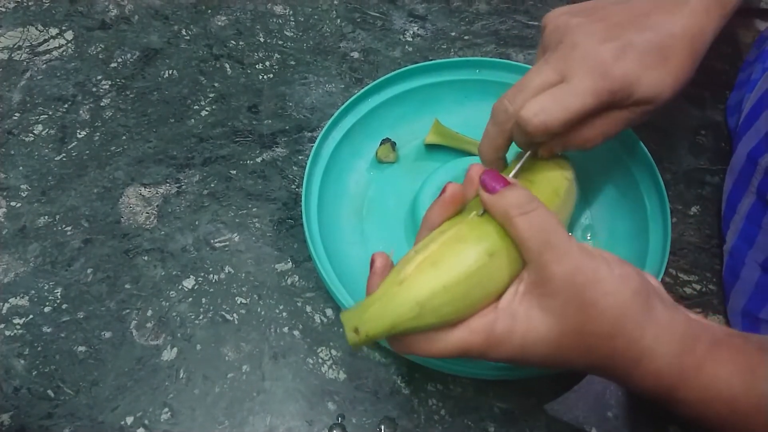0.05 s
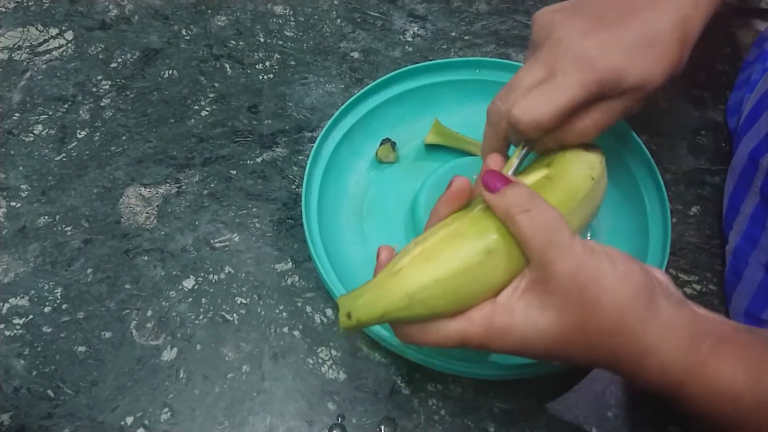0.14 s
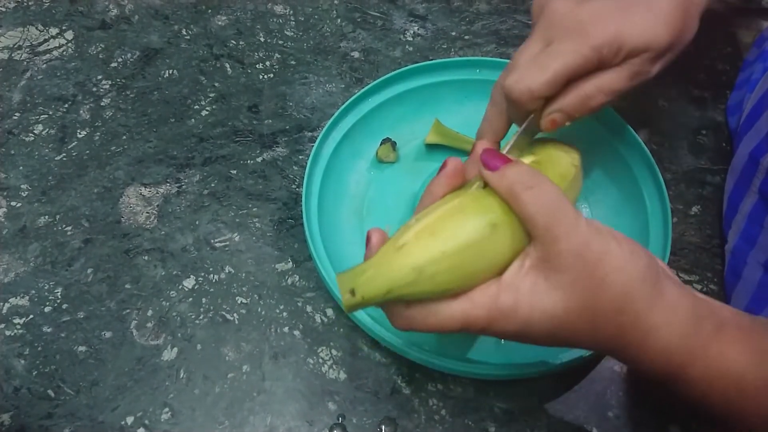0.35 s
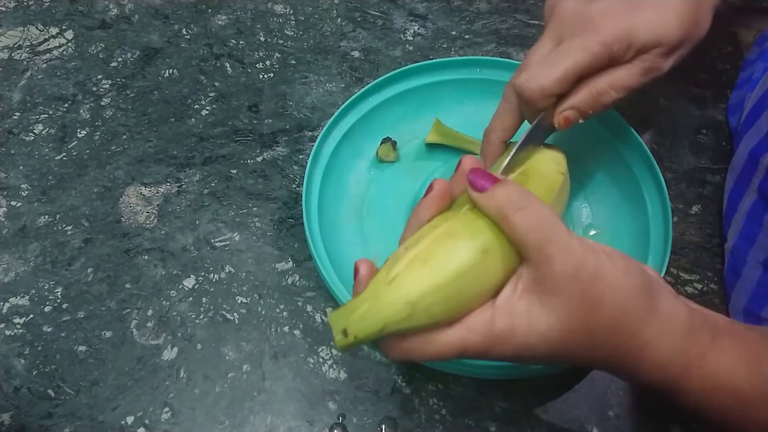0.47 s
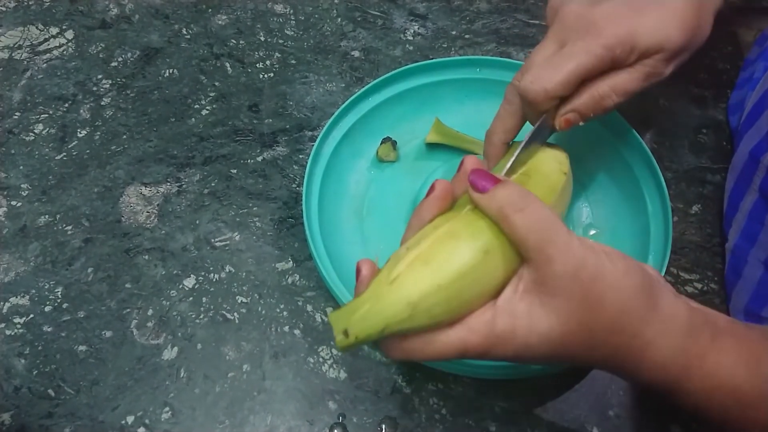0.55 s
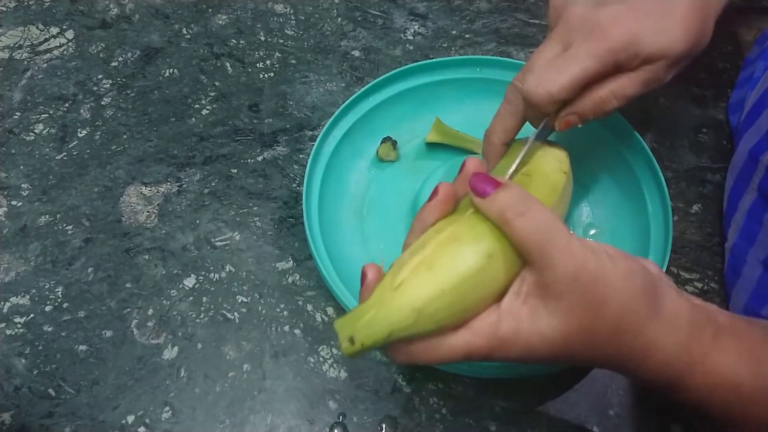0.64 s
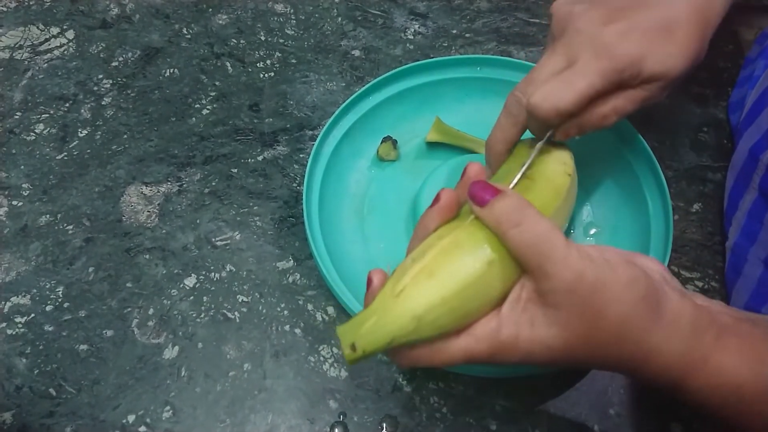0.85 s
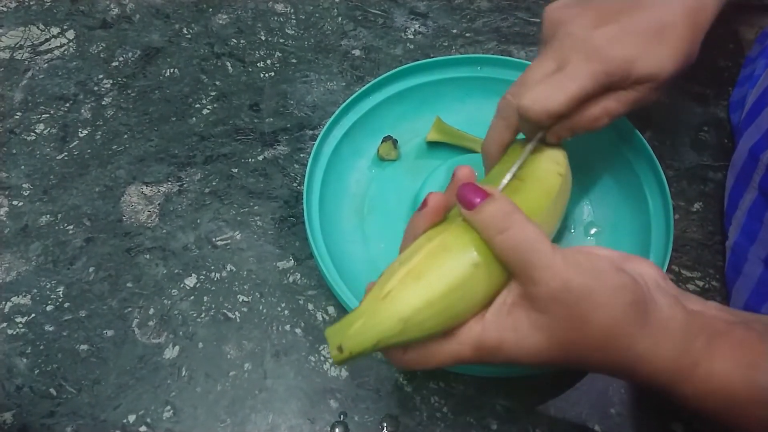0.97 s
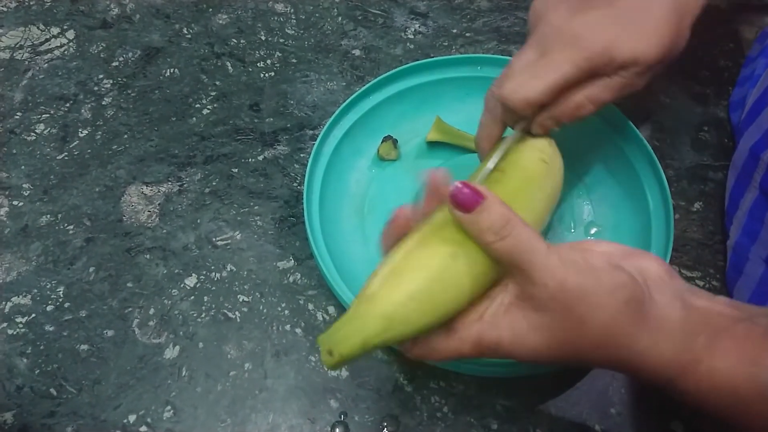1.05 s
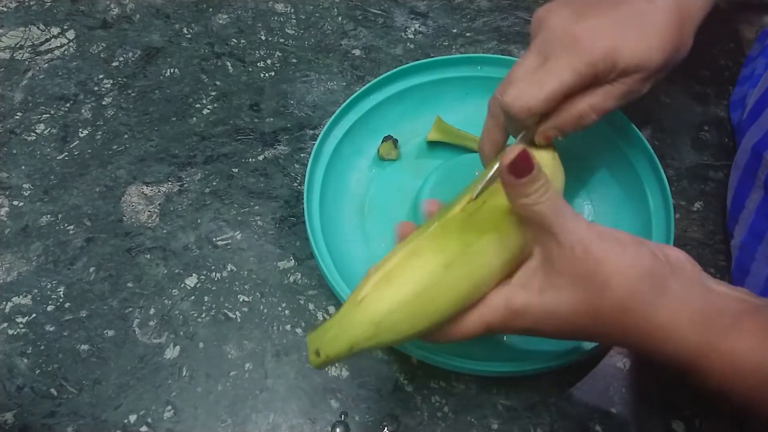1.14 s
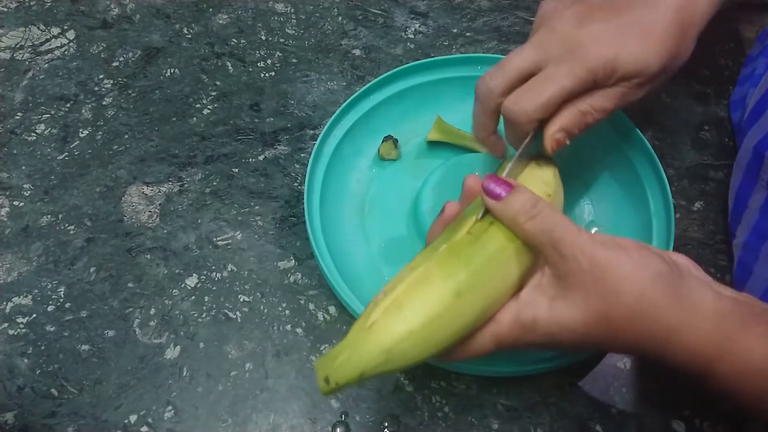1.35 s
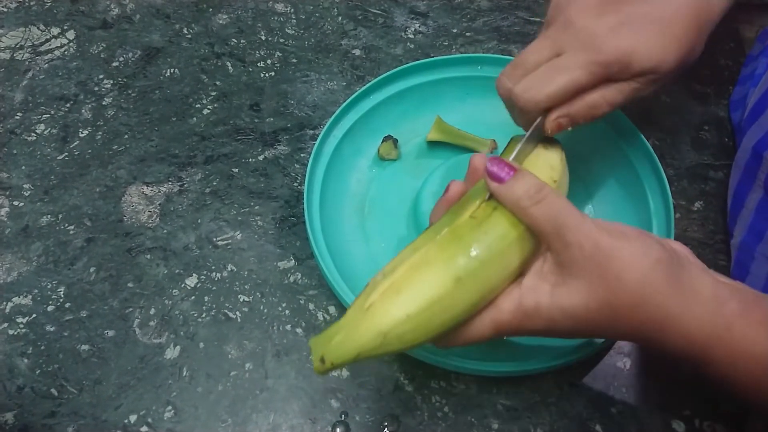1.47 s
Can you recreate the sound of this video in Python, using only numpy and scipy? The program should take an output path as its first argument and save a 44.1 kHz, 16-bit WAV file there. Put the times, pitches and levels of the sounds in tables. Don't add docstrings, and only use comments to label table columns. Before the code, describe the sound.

A knife cuts a raw banana's thick peel very close by: a loud crisp snap with a small knock, then two short gritty scrapes and a faint tick, in a hard-walled kitchen with low rumble.

```python
import sys
import numpy as np
from scipy import signal
from scipy.fft import rfft, irfft
from scipy.io import wavfile
from scipy.ndimage import uniform_filter1d

SR = 44100
rng = np.random.default_rng(int(sys.argv[2]) if len(sys.argv) > 2 else 0)


def wrap_up_sound(samples):
    columns = np.atleast_2d(samples).T
    tamed = np.clip(columns, -1, 1)
    steps = np.round(tamed * 32767).astype(np.int16)
    wavfile.write(sys.argv[1], SR, steps)


def invert_db(level):
    return 10 ** (np.asarray(level, dtype=float) / 20)


N = 66150


def level(x, db):
    return x * invert_db(db) / np.sqrt(np.mean(x ** 2))


def read(table, at_hz):
    hz, db = np.array(table, float).T
    return np.interp(np.log(at_hz), np.log(hz), db)


def colour(x, *tables, size=4096):
    hz = np.maximum(np.arange(size // 2 + 1) * SR / size, 1)
    low_hz, high_hz = tables[0][0][0], tables[0][-1][0]
    db = sum(read(table, hz) for table in tables)
    db = db - 30 * np.clip(np.log2(low_hz / hz), 0, 3)
    db = db - 40 * np.clip(np.log2(hz / high_hz), 0, 2)
    cepstrum = irfft(np.log(invert_db(db)))
    cepstrum[1:size // 2] *= 2
    cepstrum[size // 2 + 1:] = 0
    impulse = irfft(np.exp(rfft(cepstrum)))[:size // 2]
    return signal.fftconvolve(x, impulse)[:N]


def walk(rate_hz):
    hold = int(SR / rate_hz)
    steps = np.repeat(rng.standard_normal(N // hold + 1), hold)
    drift = uniform_filter1d(uniform_filter1d(steps, hold), hold)[:N]
    return drift / np.std(drift)


def pair(make):
    b, a = signal.butter(2, 1250, fs=SR)
    shared = signal.lfilter(b, a, make())
    owns = make(), make()
    return [own + 0.72 * (shared - signal.lfilter(b, a, own)) for own in owns]


# frequency in Hz, width in Hz, level in dB rms.
MOTOR_LINES = [(62, 5.3, -65.5), (101.9, 3.82, -65), (134.3, 9.9, -73), (170, 9.03, -69)]


def motor():
    out = np.zeros(N)
    for hz, width_hz, db in MOTOR_LINES:
        cycles = np.cumsum(hz + width_hz * 0.34 * walk(9)) / SR
        out += level(np.sin(2 * np.pi * cycles) * invert_db(3.0 * walk(width_hz)), db)
    return out


# frequency in Hz, density in dB per Hz.
HUM_SPECTRUM = [(15, -58), (28, -40), (50, -4.5), (80, -7), (150, -2), (230, -11.5), (320, -10.5),
                (413, -15), (900, -38), (1170, -60), (1980, -120)]
HUM_DB = -58.5
# time in seconds, level in dB.
RUMBLE_SWELL = [(0.0, -56), (0.054, -60), (0.15, -56.5), (0.852, -56), (0.868, -58), (1.018, -58),
                (1.072, -60.5), (1.316, -58.5), (1.5, -60)]


def rumble():
    traffic = level(colour(rng.standard_normal(N), HUM_SPECTRUM), HUM_DB - 1.5)
    swell_db = np.interp(np.arange(N) / SR, *np.array(RUMBLE_SWELL).T)
    return (traffic + motor()) * invert_db(swell_db - HUM_DB)


# time in seconds, level in dB.
DRONE_LEVEL = [(0, -64), (.12, -55.5), (.3, -61), (.5, -67), (.7, -72), (1.5, -85)]


def drone():
    t = np.arange(N) / SR
    db = np.interp(t, *np.array(DRONE_LEVEL).T)
    return invert_db(db + 1.1 * walk(10)) * np.sin(2 * np.pi * 273 * t)


# frequency in Hz, gain in dB.
BODY = [
    [(650, -23), (1000, -12.5), (1800, -17.5), (2600, -11), (3600, -5.5), (4450, 0), (5400, -4), (6500, -7.5)],
    [(650, -12.5), (1100, -7.5), (1900, -1.63), (2400, 1.5), (3300, 0), (4000, -1), (5500, 0.9), (6500, -5)],
]
# frequency in Hz, gain in dB.
SHEEN = [
    [(6500, -3.5), (7500, -6), (8800, -6), (10000, -2), (11500, -1.5), (13200, 8.5), (14500, 3), (15500, 1)],
    [(6500, -10.5), (7500, 0.7), (8800, 4), (10000, -1.8), (11500, 2.5), (13000, -3.5), (14500, -2.5), (15500, -5.5)],
]
# frequency in Hz, gain in dB.
AIR = [
    [(700, 19.5), (1000, 9), (1800, 3.5), (4500, -5.5), (6500, -10)],
    [(700, 16), (1000, 12), (1800, 0.5), (2700, 7.5), (6500, -8)],
]


def hiss():
    air_db, sheen_db = -103, -113
    out = []
    for port, air in enumerate(pair(lambda: rng.standard_normal(N))):
        low = invert_db(air_db) * colour(air, BODY[port], AIR[port])
        high = invert_db(sheen_db) * colour(air, SHEEN[port])
        out.append(low + high)
    return np.sqrt(SR / 2) * np.array(out)


def background():
    hum = rumble() + drone()
    out = hum * invert_db([[-2.6], [2.4]]) + hiss()
    out[0] -= 0.48 * signal.lfilter(*signal.butter(1, 200, "high", fs=SR), hum)
    apart = [level(colour(rng.standard_normal(N), HUM_SPECTRUM), HUM_DB - 10.5) for port in (0, 1)]
    return out + np.array(apart)


def fibres(rate_hz, scatter_db):
    hits = rng.random(N) < rate_hz / SR
    sizes = rng.standard_normal(N) * invert_db(scatter_db * rng.exponential(size=N))
    return level(hits * sizes, 0)


def stroke(curves, slips, hand, body_db, sheen_db, slip_db, slip_s, ring_db, left_db, spit, scatter_db, clump_db):
    t = np.arange(N) / SR
    at_s, push_db, bright_db = np.vstack(curves).T
    push = invert_db(np.interp(t, at_s, push_db, left=-120, right=-120))
    burst, out = push.copy(), np.zeros((2, N))
    age = np.arange(SR // 20) / SR
    fade = age / slip_s * np.exp(1 - age / slip_s)
    for start_s, db, hz in slips:
        now = int(start_s * SR) + np.arange(len(age))
        burst[now] = np.hypot(burst[now], invert_db(db + slip_db) * fade)
        ring = fade * np.sin(2 * np.pi * hz * age)
        out[:, now] += invert_db(db + ring_db) * invert_db([[left_db], [0]]) * ring
    sheen = (push + spit * (burst - push)) * invert_db(np.interp(t, at_s, bright_db))
    clumps = invert_db(clump_db * walk(180))
    tear = pair(lambda: fibres(14000, scatter_db))
    for port in (0, 1):
        tables = [BODY[port], hand] if port == 1 else [BODY[port]]
        out[port] += invert_db(body_db) * colour(burst * clumps * tear[port], *tables)
        bright = sheen * np.sqrt(clumps) * fibres(20000, scatter_db)
        out[port] += invert_db(sheen_db) * colour(bright, SHEEN[port])
    return out


# time in seconds, level in dB, brightness in dB.
CUT_PRESSURE = [
    [(0.0, -52, 2), (0.022, -56.5, -1.5), (0.026, -54, -3), (0.078, -62.5, 3.5), (0.138, -62.5, 1.5),
     (0.144, -53.5, 0), (0.17, -62, 3)],
    [(0.172, -61, 8.5), (0.197, -51, 8.5), (0.2, -45.5, -0.5), (0.212, -43.5, 1), (0.229, -32, -0.5),
     (0.233, -22, -2), (0.252, -27.5, -4.5), (0.27, -31, -4.5), (0.3, -35.5, -8)],
    [(0.305, -34, -13.5), (0.353, -37, -3), (0.391, -43, -9.5), (0.463, -51.5, -10.5), (0.533, -50.5, -4.5),
     (0.589, -60, -10), (0.76, -73.5, 0)],
]
# start in seconds, peak in dB, ring in Hz.
CUT_SLIPS = [(0.0267, -33.5, 3770), (0.1825, -40, 8860), (0.198, -22, 13200), (0.2032, -23, 3520),
             (0.2164, -26, 4960), (0.2214, -16.5, 3880), (0.2312, -11.5, 3446), (0.2372, -14, 3440),
             (0.2372, -5.5, 4136), (0.2429, -15.5, 3550), (0.2464, -8.5, 4200), (0.2493, -11, 3950),
             (0.2406, -14.5, 5550), (0.257, -18, 5260), (0.26, -22, 2530), (0.2699, -15, 4010),
             (0.335, -22, 5030), (0.499, -35.5, 3740)]
# frequency in Hz, gain in dB.
HAND_CUT = [(1500, -2), (2500, 2), (3300, 0), (4000, 4.5), (5000, -1.26)]


def cut():
    return stroke(CUT_PRESSURE, CUT_SLIPS, HAND_CUT, body_db=7.0, sheen_db=5.5, slip_db=-17.5, slip_s=0.0016,
                  ring_db=-10.5, left_db=-27, spit=1.0, scatter_db=0.53, clump_db=0.94)


# time in seconds, level in dB, brightness
# in dB.
SNAPS = [(0.1434, -27, -6), (0.1837, -40, 0), (0.1987, -32, 0), (0.2045, -23, -8), (0.207, -22, -4),
         (0.217, -18, 1), (0.2221, -10, 2), (0.2317, -4, 3), (0.238, 0.5, -2), (0.2398, -13, -1.5),
         (0.242, 1, -2), (0.25, -3, 1), (0.252, -10, -4.5), (0.2544, -16, -0.5), (0.7933, -34, -1),
         (0.8114, -32, -1), (0.8135, -27, -6), (0.8277, -33, -4.5), (0.8335, -30, -6.5), (0.869, -30, -2),
         (0.8854, -28, -2), (0.9035, -34, 0), (0.912, -28, -2), (1.004, -35, 0), (1.0173, -32, -8),
         (1.0172, -30, -9), (1.2314, -33, -20), (1.239, -39, -16)]


def snaps():
    at_s, db, bright_db = np.array(SNAPS).T
    now = (at_s * SR).astype(int)
    sign = np.sign(rng.standard_normal(len(now)))
    dull, bright = np.zeros((2, N))
    dull[now] = sign * invert_db(db)
    bright[now] = sign * invert_db(db + bright_db - 2)
    out = np.array([colour(dull, BODY[port]) + colour(bright, SHEEN[port]) for port in (0, 1)])
    return out * invert_db([[-13.5], [0]])


# frequency in Hz, level in dB, T60 in seconds.
THUD_MODES = [(373.3, -38, 0.081), (399, -42, 0.058), (523, -34.5, 0.056), (867, -32.5, 0.042),
              (1063, -25, 0.051), (1300, -29, 0.046), (4067, -12, 0.024), (8300, -34, 0.028)]


def thud():
    start_s, rise_s = 0.234, 0.0065
    age = np.clip(np.arange(N) / SR - start_s, 0, None)
    knock = np.zeros(N)
    for hz, db, t60_s in THUD_MODES:
        knock += invert_db(db - 60 * age / t60_s) * np.sin(2 * np.pi * hz * age)
    return knock * (1 - np.exp(-age / rise_s)) * invert_db([[-4.5], [3]])


# time in seconds, level in dB, brightness in dB.
SCRAPE_PRESSURE = [
    [(0.765, -80, 12), (0.792, -71, 4.5), (0.795, -51, -4.5), (0.809, -54, -7.5), (0.833, -45, -7.5),
     (0.877, -49.5, -4), (0.883, -47, -3.5), (0.955, -59.5, -5), (0.985, -59, -11)],
    [(0.99, -65, -16), (1.003, -61, -1), (1.006, -50, -5), (1.011, -47, -4.5), (1.016, -41.5, -8),
     (1.052, -50.5, -6.5), (1.158, -66.5, -11.5), (1.2, -65.5, -7)],
    [(1.205, -54.5, -14), (1.229, -69, -1), (1.232, -47, -17), (1.245, -61, -14), (1.307, -59.5, -9.5),
     (1.361, -77.5, -8), (1.367, -70, -22), (1.5, -88, 4)],
]
# start in seconds, peak in dB, ring in Hz.
SCRAPE_SLIPS = [(0.7935, -39.5, 3020), (0.8118, -33.5, 3020), (0.8226, -40, 2970), (0.828, -32, 2980),
                (0.832, -32, 3060), (0.8464, -33.5, 3440), (0.8544, -35, 3230), (0.868, -42, 3100),
                (0.8402, -41, 3100), (0.8435, -38, 3500), (0.8565, -36, 3500), (0.8827, -37.5, 3300),
                (0.888, -35, 3400), (0.8995, -41.5, 2960), (0.8807, -37.5, 3060), (0.8854, -37.5, 3370),
                (0.893, -42, 3250), (0.902, -43, 3200), (0.9123, -38.5, 3050), (1.0054, -37.5, 3570),
                (1.0141, -35, 3710), (1.0178, -29, 3080), (1.0214, -32.5, 3450), (1.0155, -31.5, 3250),
                (1.0262, -40, 3340), (1.0291, -40, 3080), (1.031, -41, 3270), (1.038, -42, 2780),
                (1.2315, -32, 2780), (1.2305, -40, 3140), (1.2322, -44, 4370), (1.2385, -45, 3600),
                (1.245, -51, 2930), (1.257, -54, 2770), (1.265, -47, 2480), (1.2614, -45.5, 2630)]
# frequency in Hz, gain in dB.
HAND_SCRAPE = [(1000, -0.8), (1800, -0.5), (2300, 2.8), (2900, 7.5), (3400, 7.5), (3900, 5), (4600, 0.1)]


def scrape():
    return stroke(SCRAPE_PRESSURE, SCRAPE_SLIPS, HAND_SCRAPE, body_db=4.0, sheen_db=5.5, slip_db=-12, slip_s=0.0008,
                  ring_db=0.46, left_db=-20.5, spit=0.6, scatter_db=0.8, clump_db=1.0)


def kitchen(x):
    t60_s, wet_db = 0.32, -7
    t = np.arange(SR // 2) / SR
    tails = rng.standard_normal((2, len(t))) * invert_db(-60 * t / t60_s) * (t > 0.003)
    wet = []
    for dry_port, tail in zip(x, tails):
        tail = tail / np.sqrt(np.sum(tail ** 2))
        wet.append(signal.fftconvolve(dry_port, tail)[:N])
    return invert_db(wet_db) * signal.lfilter([0.7], [1, -0.3], wet)


def scene():
    knife = cut() + snaps() + thud() + scrape()
    return background() + knife + kitchen(knife)


def roll_off(x):
    return signal.sosfilt(signal.butter(12, 15860, fs=SR, output="sos"), x)


def record(dry):
    top_cut = signal.ellip(10, 0.2, 80, 15850, fs=SR, output="sos")
    mix = signal.sosfilt(top_cut, dry)
    return roll_off(mix)


dry = scene()
out = record(dry)
wrap_up_sound(out)
```